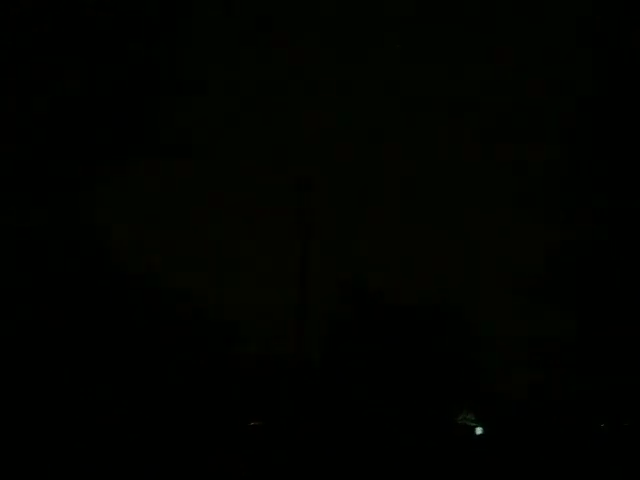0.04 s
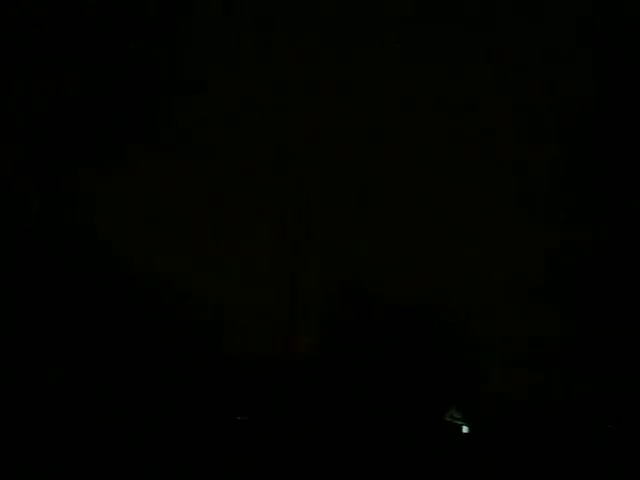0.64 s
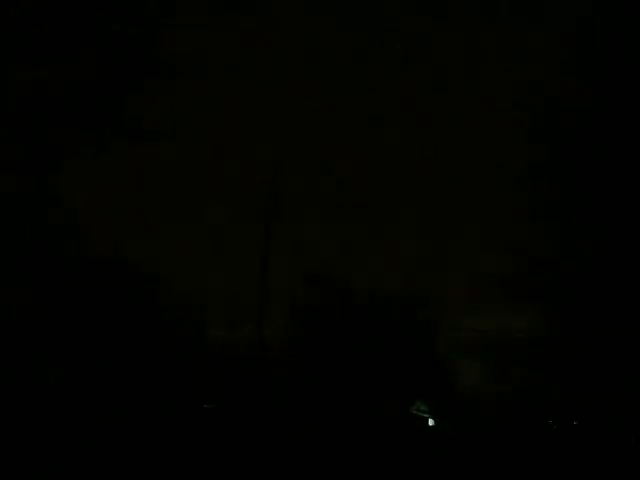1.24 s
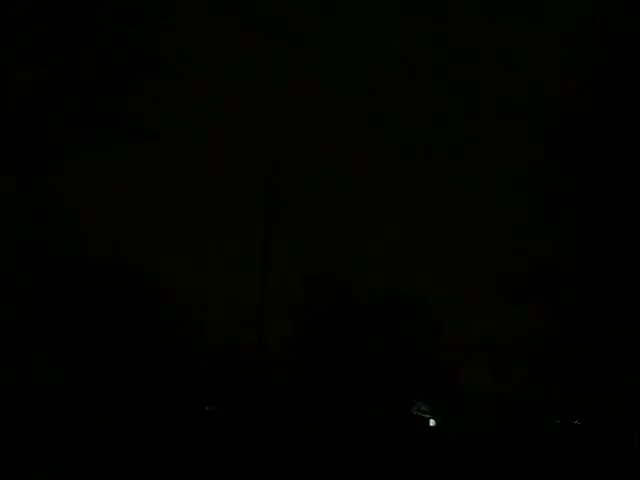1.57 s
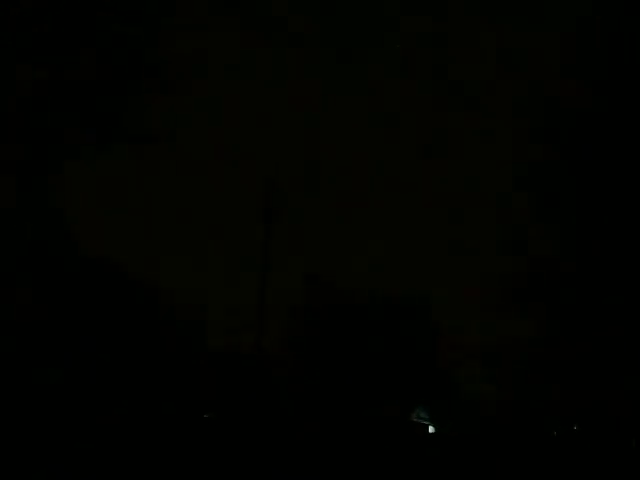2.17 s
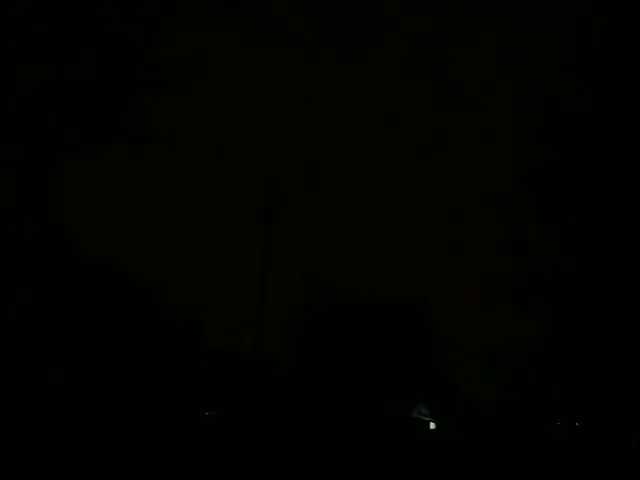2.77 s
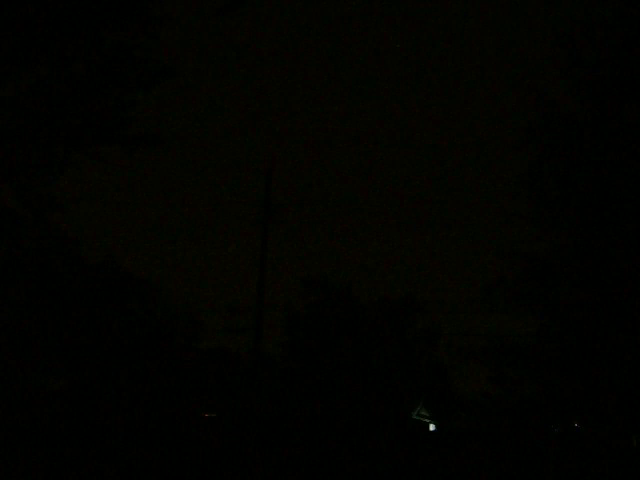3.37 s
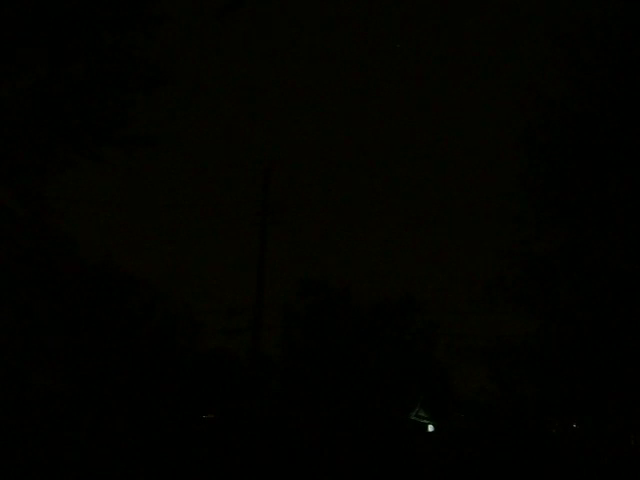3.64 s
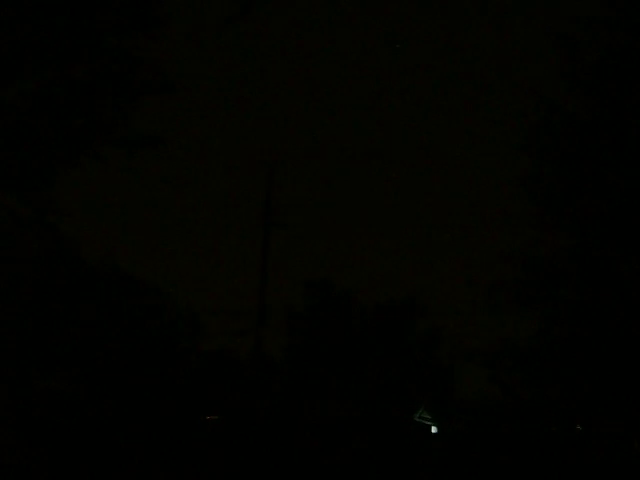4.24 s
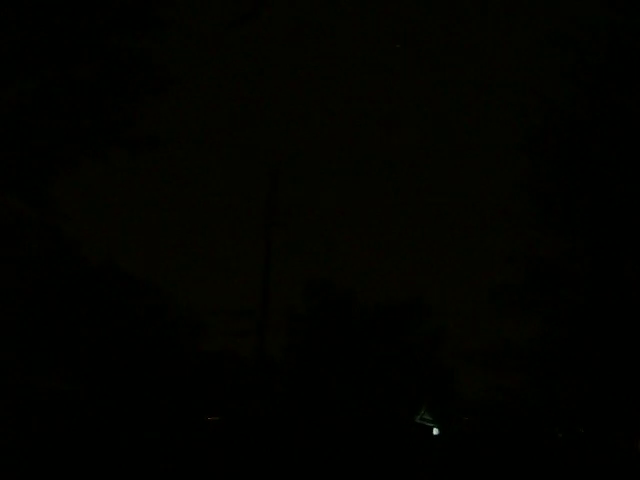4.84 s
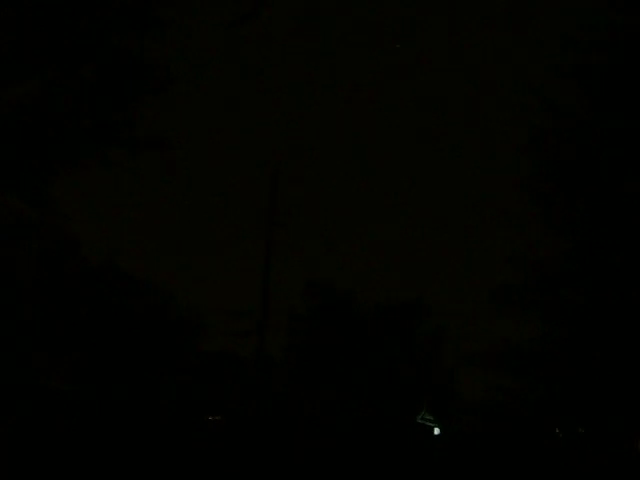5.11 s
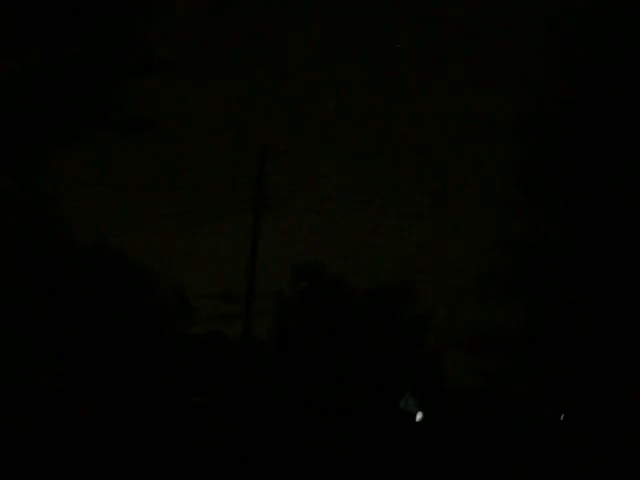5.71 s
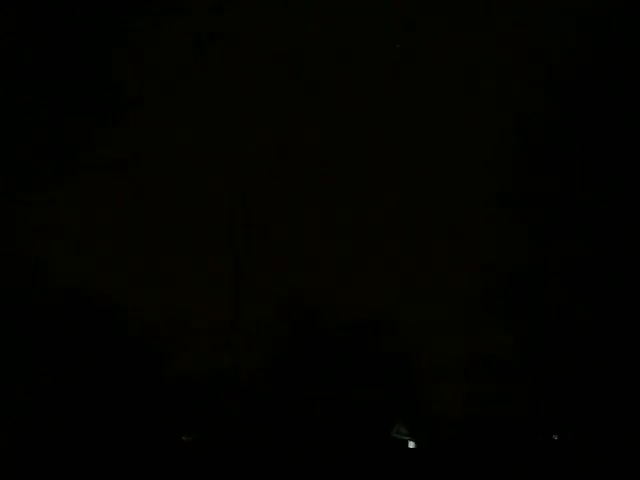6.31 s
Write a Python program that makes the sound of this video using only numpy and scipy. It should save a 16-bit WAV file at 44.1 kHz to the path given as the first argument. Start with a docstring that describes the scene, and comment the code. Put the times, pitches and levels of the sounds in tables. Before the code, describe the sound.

Steady rain hisses and drips close by while a long roll of thunder booms and slowly dies away.

```python
"""Thunder from under a porch

Steady night rain on one microphone under a porch roof. Far drops blur into hiss, nearer ones patter,
and big ones off the roof edge smack the ground or plink into puddles close by. Beyond the rain, shock
fronts from along the lightning channel arrive in a long roll of peals: rumble, boom, rolling body and
tearing edge. The level dips now and then; the narrow-band recorder ducks and overloads on loud peals."""
import sys
import numpy as np
from scipy import signal
from scipy.fft import rfft, irfft, next_fast_len
from scipy.io import wavfile
from scipy.ndimage import uniform_filter1d, map_coordinates

SR = 44100
rng = np.random.default_rng(int(sys.argv[2]) if len(sys.argv) > 2 else 0)


def inscribe(sig):
    """Save sig as 16-bit PCM at rate SR to the path in sys.argv[1].

    A 1-D sig is mono; a 2-D sig holds one channel per row.
    Samples are clipped to [-1, 1] before scaling.
    """
    pcm = np.round(np.clip(np.atleast_2d(sig).T, -1, 1) * 32767)
    wavfile.write(sys.argv[1], SR, pcm.astype(np.int16))


N = 290178

# strength of the rain beyond the porch: time_s, level_db
RAIN_LEVEL = [(0, -25), (1.2, -25.5), (1.5, -33), (2.1, -28.5), (2.7, -28.5), (4.3, -28), (4.9, -27),
              (5.3, -32), (6.58, -26.5)]
# spectrum of the far rain: frequency_hz, level_db
HISS_SPECTRUM = [(300, -11.5), (1000, 3), (1800, 0.5), (2600, -2.5), (3400, -1.5), (4300, 5.5), (5000, .5),
                 (6000, -7.5)]
# drops on hard ground near the microphone: start_s, peak_db, pitch_hz, t60_s
GROUND_DROPS = [(.031, -10, 4330, 0.041), (0.1017, -11, 4020, 0.11), (0.217, -9, 4200, 0.07),
                (.2857, -15, 3130, 0.054), (.411, -13, 4340, .05), (0.4448, -10, 3280, 0.031),
                (.479, -10, 4200, 0.21), (0.6, -12, 4240, 0.07), (0.633, -5.5, 4400, 0.036),
                (0.7623, -12, 4620, .08), (.8639, -8, 4180, 0.055), (0.925, -7.5, 3800, 0.05),
                (1.018, -10.5, 4130, 0.041), (1.097, -15, 4330, .05), (1.209, -6, 4740, 0.053),
                (1.6477, -8, 4240, .08), (2.206, -9, 4730, .068), (2.4035, -9, 4090, 0.083),
                (2.546, -6, 3860, 0.074), (2.636, -12.5, 4230, 0.1), (2.669, -8, 4440, 0.25),
                (2.7554, -6.5, 3840, .06), (3.139, -8.5, 3420, .045), (3.3856, -6, 4500, 0.076),
                (3.48, -11.5, 4240, 0.035), (3.83, -9, 4430, .05), (3.863, -4, 4120, 0.059),
                (3.957, -8, 4530, 0.037), (4.0544, -7.5, 4770, 0.035), (4.312, -10, 4450, .04),
                (4.412, -7, 4200, 0.045), (4.466, -1.5, 4250, 0.036), (4.605, -7.5, 4320, 0.24),
                (4.9983, -3.5, 4920, 0.075), (5.302, -10.5, 3950, .05), (5.329, -11.5, 4080, 0.07),
                (5.415, -12, 4430, 0.035), (5.455, -11, 4070, 0.037), (5.62, -13, 4620, .08),
                (5.92, -9.5, 4550, .055), (5.9952, -3.5, 4500, 0.059), (6.105, -11.5, 3400, 0.041),
                (6.275, -10.5, 4330, 0.064), (6.397, -6, 3880, .055)]
# drips into nearby puddles: start_s, level_db, pitch_hz, bubble_share (0-1)
PUDDLE_DRIPS = [(2.01, -3.5, 2130, 0.2), (3.246, -16.5, 2530, 0.8), (3.759, 1, 2516, .2),
                (3.893, -14.5, 2030, 0.5), (3.983, -10.5, 1840, 0.3), (4.559, -9.5, 2030, .65),
                (4.628, -8.5, 2030, .65), (4.808, -13.5, 2450, 0.6), (5.307, -12.5, 2170, 0.3),
                (6.315, -14, 1530, 0.1)]
# reverberation of the wall and roof: frequency_hz, t60_s
PORCH_DECAY = [(200, 0.15), (2000, 0.053), (6000, 0.19)]
# spectra of the thunder's four bands, deepest first: frequency_hz, level_db
RUMBLE_SPECTRUM = [(15, -18.5), (28, -12.5), (45, -3), (68, 5), (88, 3), (112, 10), (140, 5), (200, -44.5)]
BOOM_SPECTRUM = [(110, -47), (150, -7.5), (170, 0), (190, 1.5), (212, 2.5), (245, 3), (278, -1.5),
                 (380, -41)]
ROLL_SPECTRUM = [(190, -41), (285, 0), (390, 3.5), (470, 0), (650, -1.5), (800, -10.5), (1200, -55)]
TEARING_SPECTRUM = [(450, -22), (780, 2), (1000, -2), (1400, -9), (2000, -19), (3000, -32.5), (6000, -56.5)]
# scattered roll that carries on between the peals: time_s, level_db
AFTERROLL_LEVEL = [(0.0, -20.5), (0.65, -22.5), (1.25, -23), (1.8, -14.0), (2.6, -16), (3.4, -15.5),
                   (4.2, -17.5), (4.7, -16.5), (5.6, -20), (6.58, -19)]
# the tearing edge, duller as sound arrives from farther along the channel: time_s, over_roll_db
TEARING_LEVEL = [(0, -4), (1.1, -1.5), (1.5, -8), (2.6, -8), (3.2, -10), (4.7, -7.5), (6.58, -10.5)]
# peals as they reach the porch: start_s, hold_s, level_db, boom_offset_db, rumble_offset_db
THUNDER_PEALS = [(-.04, 0.066, -20, 1, 1), (.205, 0.049, -25, -17, 3.5), (0.386, 0.066, -24, 2, -2),
                 (0.743, 0.081, -17, -10.5, -15), (0.929, 0.24, -19, -17, -18.5), (1.297, 0.13, -5, -2, -7),
                 (1.505, 0.075, -7.5, -4.5, -4), (1.805, .135, -7.5, -2.5, -13),
                 (1.956, 0.19, -2.5, -1.5, -8.5), (2.196, 0.15, -10.5, -2, -14.5),
                 (2.396, 0.1, -5, -4.5, -19.5), (2.54, 0.13, -14.5, -9, -13),
                 (2.732, 0.038, -5.5, -2.5, -24), (2.841, 0.094, -2.5, -.5, -12.5),
                 (3.016, 0.2, -10, 3, -15), (3.287, 0.15, -13.5, 2, -17), (3.539, 0.057, -17.5, 3, -19.5),
                 (3.685, 0.032, -8, 2, -11.5), (3.77, .045, -8, 2.5, -13), (3.994, 0.088, -12, 7, -8),
                 (4.186, .08, -9, 0, -9), (4.331, .072, -13.5, 5, -13.5), (4.473, 0.046, -6.5, 4.5, -7.5),
                 (4.825, 0.1, -21, 0, -1), (5.244, 0.039, -16, 0.5, -13.5),
                 (5.364, 0.037, -16.5, -4.5, -20), (5.628, 0.12, -16.5, -4, -14.5),
                 (6.227, .133, -19, 2.5, -12), (6.511, 0.047, -21.5, 8, -11.5)]
# single heavy thuds within the peals: centre_s, peak_db, pitch_hz, half_length_s
HEAVY_THUDS = [(1.335, -7.5, 363, .023), (1.43, -10.5, 97.2, 0.036), (1.568, -4.5, 368.5, 0.039),
               (1.821, -5.5, 316, 0.018), (2.032, -3.5, 389.7, 0.064), (2.453, -6, 239, 0.042),
               (2.937, 0, 238.8, .047), (3.059, -4, 195.7, 0.028), (3.155, -2, 196.4, .03),
               (3.734, 3.5, 231, .024), (3.785, -3, 191.2, .045), (3.809, 3, 398, .02),
               (4.035, -4, 186.5, 0.027), (4.365, -6.5, 379, 0.014), (4.399, 0.5, 194, 0.015),
               (4.5, 2.5, 300.5, .014), (5.28, -7, 320, .016), (5.68, -12.5, 233, 0.013)]
# brief dips of the whole sound, sized for the bass: start_s, swell_before_db, depth_db, recovery_s
LEVEL_DIPS = [(0.294, 1, 6.5, 0.075), (.505, -0.5, 6, 0.34), (1.175, -1.5, 6, 0.088), (2.126, -5, 12, .09),
              (2.47, -1.5, 5, 0.11), (2.685, 0, 3.5, .05), (2.958, -2.5, 1.5, 0.26), (3.17, 2, 3, 0.089),
              (3.488, 2, 2, 0.17), (4.058, 0, 7, 0.25), (4.615, -2, 4.5, 0.28), (4.997, 2, 11.5, 0.31),
              (5.798, 7, 3.5, 0.56), (6.372, 1, 7, .17)]
# narrow-band sound, treble cut off above about 6 kHz: frequency_hz, gain_db
RECORDING_BANDWIDTH = [(10, 1), (25, 1), (4950, -1), (5400, -6), (5850, -13.5), (6150, -27.5), (6450, -63),
                       (7000, -100)]


def amp(db):
    """Decibels to gain."""
    return 10 ** (np.asarray(db) / 20)


def unit(x):
    """x at rms 1."""
    return x / np.sqrt(np.mean(x ** 2) + 1e-20)


def along(points, hz):
    """(frequency_hz, value) points read on a log frequency axis."""
    knots_hz, values = np.transpose(points)
    return np.interp(np.log(hz + 1), np.log(knots_hz + 1), values)


def curve(points):
    """(time_s, value) points read at every sample."""
    return np.interp(np.arange(N) / SR, *np.transpose(points))


def wobble(rate):
    """A smooth random curve, rate knots a second."""
    return map_coordinates(rng.standard_normal(int(N * rate / SR) + 4), [np.arange(N) * rate / SR])


def filtered(x, response):
    """x through a gain given as a function of frequency."""
    size = next_fast_len(len(x) + 8192)
    return irfft(rfft(x, size) * response(np.fft.rfftfreq(size, 1 / SR)), size)[:len(x)]


def coloured(x, spectrum):
    """x through a (frequency_hz, gain_db) spectrum."""
    return filtered(x, lambda hz: amp(along(spectrum, hz)))


def add(track, start_s, sound):
    """Mix a sound into a track."""
    part = track[max(round(start_s * SR), 0):][:len(sound)]
    part += sound[:len(part)]


def patter(count, pitch_hz, spread, cycles, scatter_db):
    """Many drops of random size, each a tick that rings for a few cycles."""
    when, faintness, tone = rng.random((count, 3)).T[:, :, None]
    hz = np.clip(pitch_hz * (tone / (1 - tone)) ** spread, 900, 7000)
    offsets = np.arange(SR // 200)
    turns = hz * offsets / SR
    strength = amp(-scatter_db * np.log(faintness + 0.11))
    ticks = strength * np.sin(2 * np.pi * turns) * np.exp(-turns / cycles)
    positions = (when * N).astype(int) + offsets
    return unit(np.bincount(positions.ravel(), ticks.ravel(), N)[:N])


def rain():
    """Far drops blur into hiss; nearer ones patter in flurries on leaves and paving."""
    hiss = amp(0.5) * unit(coloured(rng.standard_normal(N), HISS_SPECTRUM))
    leaves = amp(-4.5) * patter(count=4000, pitch_hz=4110, spread=0.13, cycles=4.2, scatter_db=6.5)
    paving = amp(-4) * patter(count=650, pitch_hz=5040, spread=0.064, cycles=1.7, scatter_db=4.0)
    flurry_db = 0.86 * wobble(rate=14)
    return amp(curve(RAIN_LEVEL)) * (hiss + amp(flurry_db) * (leaves + paving))


def splash(pitch_hz, t60_s, width, spray_db):
    """A sharp impact, then a short spray of droplets around one pitch; peak 1."""
    t = np.arange(SR // 6) / SR
    impact = amp(-60 * t / 0.0022)
    spray = amp(spray_db - 60 * t / t60_s)
    burst = (impact + spray) * rng.standard_normal(len(t))
    band = signal.iirpeak(pitch_hz, 1 / width, SR)
    sound = signal.lfilter(*band, signal.lfilter(*band, burst))
    return sound / np.abs(sound).max()


def near_drops():
    """Close to the microphone, big drops off the roof edge smack the ground or plink into puddles."""
    track, t = np.zeros(N), np.arange(SR // 6) / SR
    for start_s, peak_db, pitch_hz, t60_s in GROUND_DROPS:
        add(track, start_s, amp(peak_db) * splash(pitch_hz, t60_s, width=0.45, spray_db=-3.5))
    for start_s, level_db, pitch_hz, bubble_share in PUDDLE_DRIPS:
        turns = pitch_hz * t * (1 + 2 * t)  # the trapped bubble rises in pitch as it nears the surface
        bubble = np.sin(2 * np.pi * turns) * amp(-60 * t / 0.053) * (1 - np.exp(-t / 0.0019))
        splat = splash(pitch_hz, t60_s=0.11, width=0.76, spray_db=8.5)
        add(track, start_s, amp(level_db) * ((1 - bubble_share) * splat + bubble_share * bubble))
    return track


def porch(x):
    """The short answer of the wall and roof around the microphone."""
    hz, t, noise = signal.stft(rng.standard_normal(SR // 3), SR, nperseg=256)
    decay = amp(-60 * t / along(PORCH_DECAY, hz)[:, None])
    tail = signal.istft(noise * decay, SR, nperseg=256)[1]
    return signal.fftconvolve(x, tail / np.linalg.norm(tail))[:N]


def shocks(spectrum, rate, even_s):
    """Pressure fronts of random size and sign merge into a roar, held near rms 1 over spans of even_s."""
    fronts = (rng.random(N) < rate / SR) * rng.standard_normal(N)
    roar = unit(coloured(fronts, spectrum))
    span = int(even_s * SR)
    power = np.abs(uniform_filter1d(uniform_filter1d(roar ** 2, span), span))
    return roar / np.sqrt(power + 0.01)


def thuds():
    """Where many fronts arrive together they pile into a few heavy cycles that sag in pitch."""
    track, t = np.zeros(N), np.arange(-SR // 8, SR // 8) / SR
    for centre_s, peak_db, pitch_hz, half_length_s in HEAVY_THUDS:
        turns = pitch_hz * t * (1 - 0.25 * t) + rng.random()
        envelope = amp(peak_db) * np.exp(-(t / half_length_s) ** 2)
        add(track, centre_s + t[0], envelope * np.sin(2 * np.pi * turns))
    return track


def peal(start_s, hold_s, attack_s, fade_db_per_s):
    """Envelope of one peal: a rise, a hold, a steady fade."""
    t = np.arange(N) / SR - start_s
    return np.clip(t / attack_s, 0, 1) * amp(-fade_db_per_s * np.maximum(t - hold_s, 0))


def thunder():
    """Peals pile onto the afterroll: the far channel rumbles and booms, nearer parts roll and tear."""
    afterroll_db = curve(AFTERROLL_LEVEL)
    roll_power = amp(afterroll_db) ** 2
    boom_power = amp(afterroll_db - 4) ** 2
    rumble_power = amp(afterroll_db - 14.5) ** 2
    for start_s, hold_s, level_db, boom_offset_db, rumble_offset_db in THUNDER_PEALS:
        quick = peal(start_s, hold_s, attack_s=0.035, fade_db_per_s=152)
        slow = peal(start_s, hold_s, attack_s=0.074, fade_db_per_s=113.5)
        roll_power += (amp(level_db) * quick) ** 2
        boom_power += (amp(level_db + boom_offset_db) * quick) ** 2
        rumble_power += (amp(level_db + rumble_offset_db) * slow) ** 2
    rumble = np.sqrt(rumble_power) * shocks(RUMBLE_SPECTRUM, rate=600, even_s=0.23)
    boom = np.sqrt(boom_power) * shocks(BOOM_SPECTRUM, rate=700, even_s=0.06)
    roll = np.sqrt(roll_power) * shocks(ROLL_SPECTRUM, rate=2000, even_s=0.054)
    tearing_gain = np.sqrt(roll_power) * amp(curve(TEARING_LEVEL))
    tearing = tearing_gain * shocks(TEARING_SPECTRUM, rate=5000, even_s=0.05)
    return rumble + boom + roll + tearing + thuds()


def dips(x, swell_s=0.25, fall_s=0.0059, crossover_hz=1260):
    """The level drifts before each dip, falls at once and climbs back, a little more in the treble."""
    t, gain_db = np.arange(N) / SR, np.zeros(N)
    for start_s, swell_before_db, depth_db, recovery_s in LEVEL_DIPS:
        knots_s = [-swell_s, 0, fall_s, recovery_s / 2, recovery_s]
        knots_db = [0, swell_before_db, -depth_db, -0.62 * depth_db, 0]
        gain_db += np.interp(t - start_s, knots_s, knots_db)
    bass = filtered(x, lambda hz: 1 / (1 + (hz / crossover_hz) ** 4))
    treble = x - bass
    return amp(gain_db) * bass + amp(1.12 * gain_db) * treble


def scene():
    """In mono from the porch: rain and drips, their faint answer off wall and roof, thunder beyond."""
    water = rain() + near_drops()
    return dips(thunder() + water + amp(-17) * porch(water))[None]


def gain_control(x, threshold_db=-9, squeeze=0.54, release_db_per_s=29, sense_s=0.02, makeup_db=0.4):
    """Loud peals turn the recorder's gain down at once, ducking the rain; it creeps back afterwards."""
    power = np.abs(uniform_filter1d(x ** 2, int(sense_s * SR)))
    level_db = 10 * np.log10(power + 1e-9)
    release_db = release_db_per_s * np.arange(N) / SR
    held_db = np.maximum.accumulate(level_db + release_db) - release_db  # held peaks sink steadily
    return x * amp(makeup_db - squeeze * np.maximum(held_db - threshold_db, 0))


def record(dry):
    """The recorder ducks and saturates on the peals; little treble passes, and overshoot is cut flat."""
    knee, hardness, ceiling, top_hz = 0.755, 10, 0.715, 15870
    ducked = gain_control(dry[0])
    saturated = ducked / (1 + np.abs(ducked / knee) ** hardness) ** (1 / hardness)
    clipped = np.clip(coloured(saturated, RECORDING_BANDWIDTH), -ceiling, ceiling)
    return filtered(clipped, lambda hz: hz < top_hz)[None]


dry = scene()
out = record(dry)
inscribe(out)
```